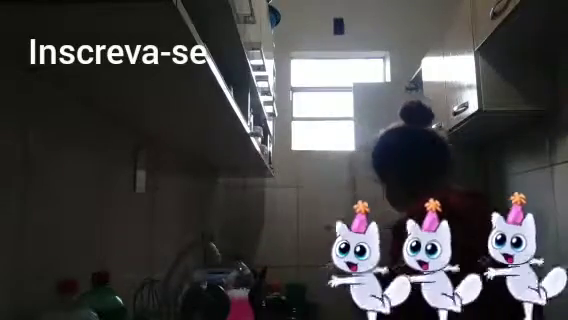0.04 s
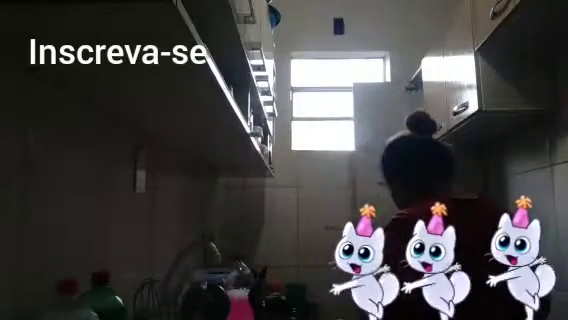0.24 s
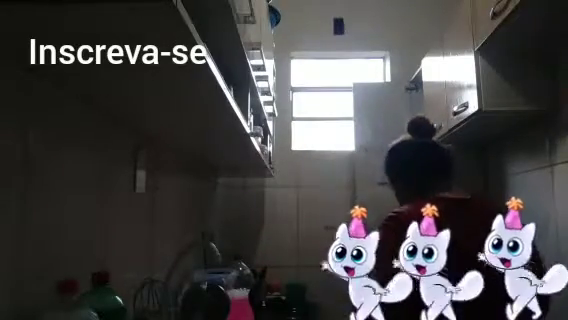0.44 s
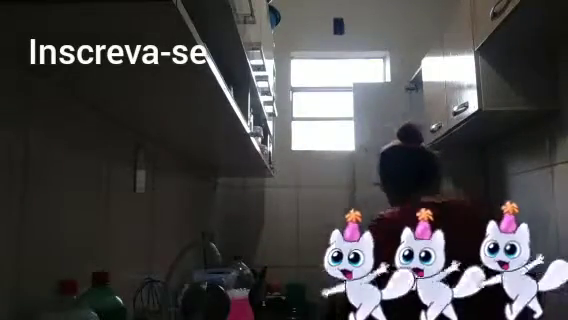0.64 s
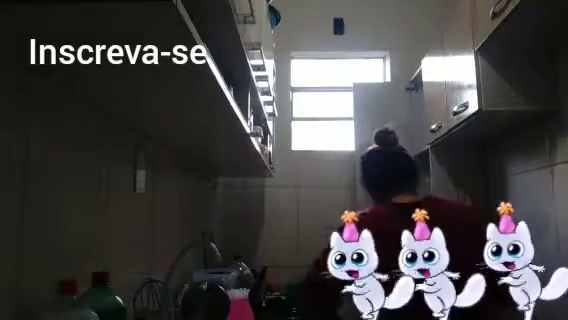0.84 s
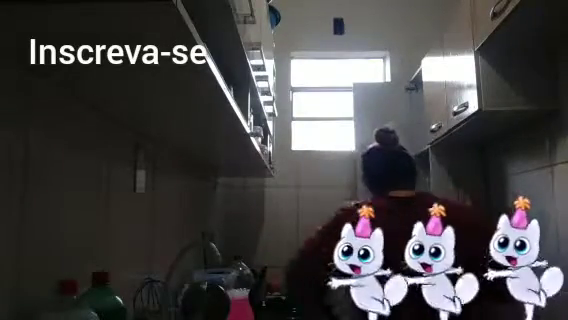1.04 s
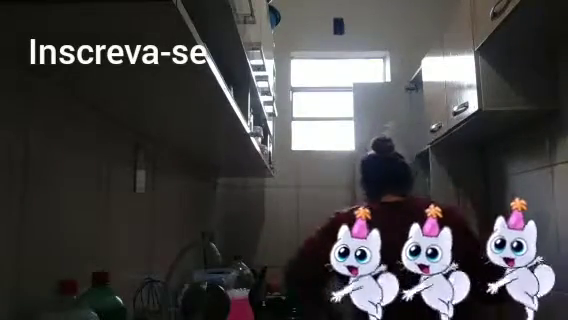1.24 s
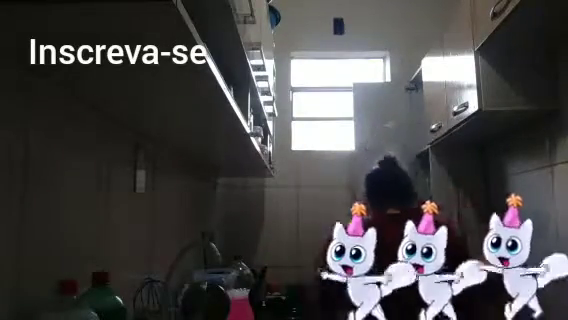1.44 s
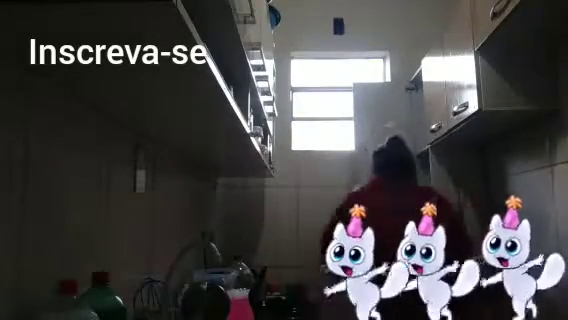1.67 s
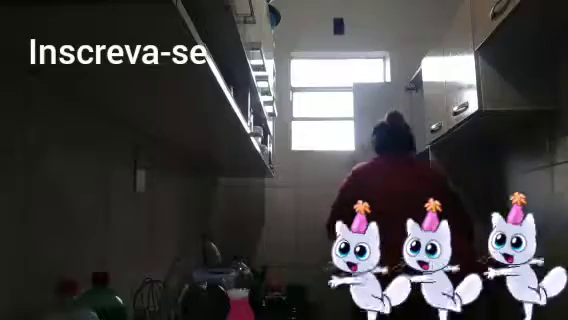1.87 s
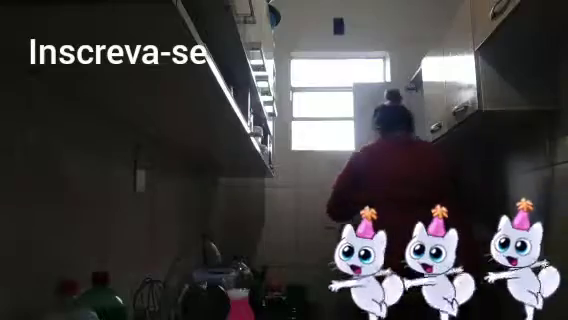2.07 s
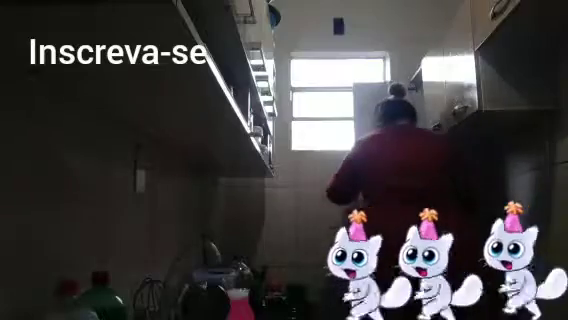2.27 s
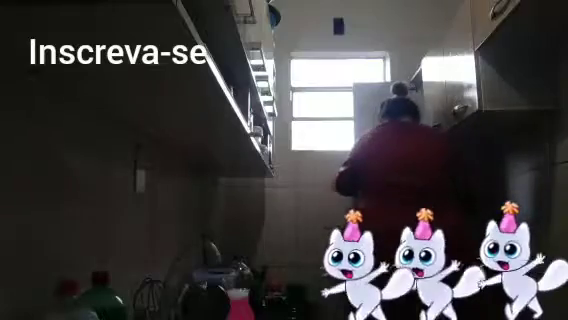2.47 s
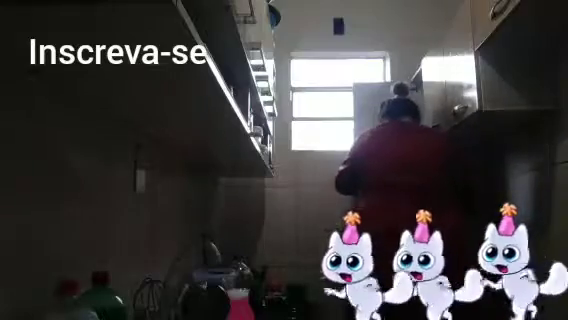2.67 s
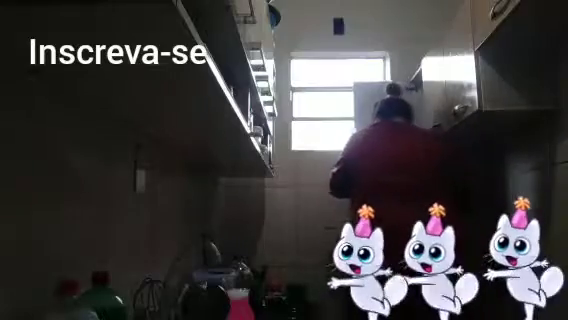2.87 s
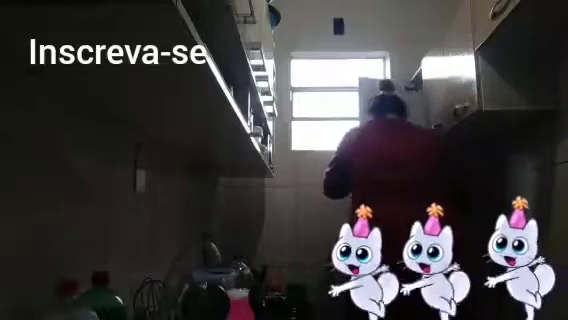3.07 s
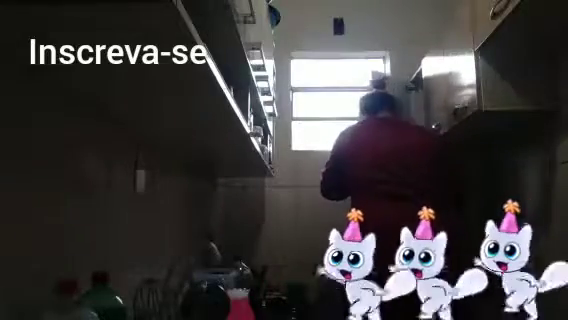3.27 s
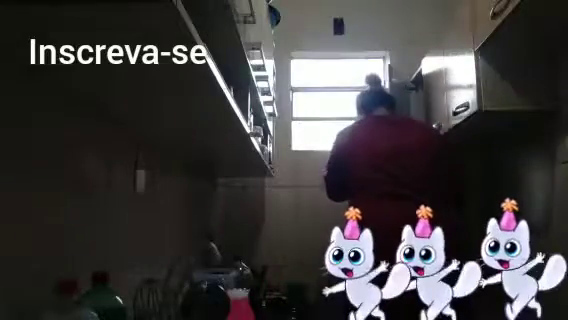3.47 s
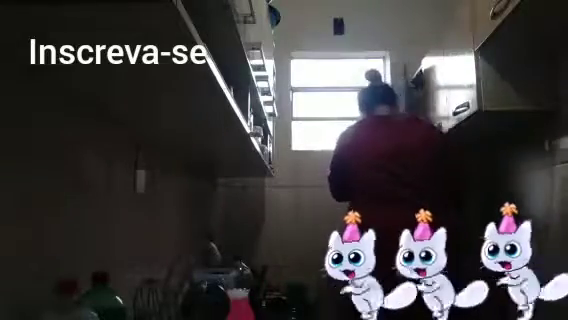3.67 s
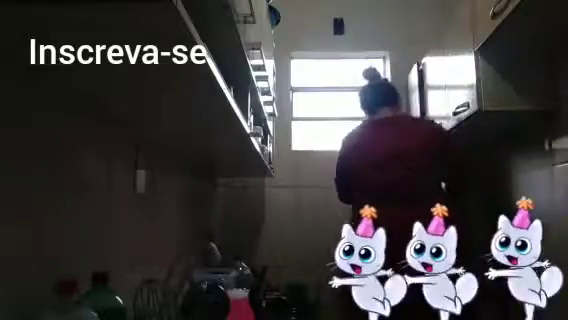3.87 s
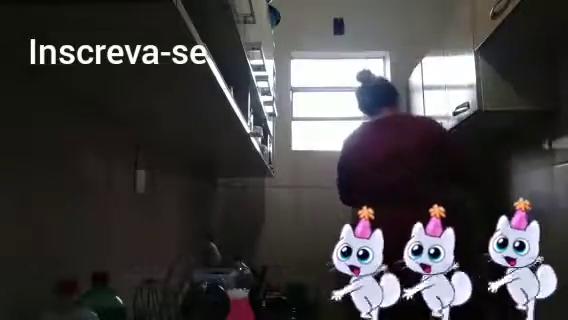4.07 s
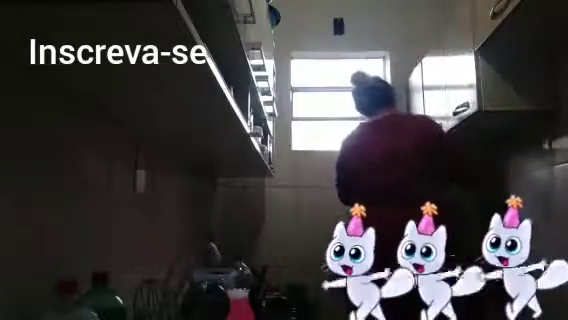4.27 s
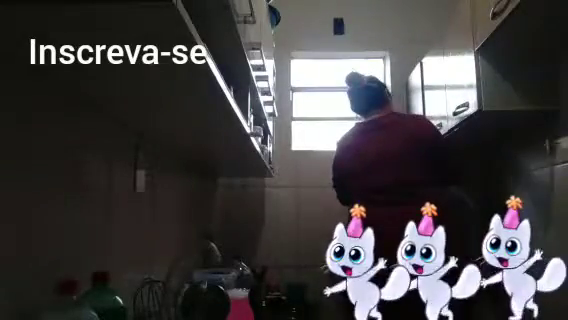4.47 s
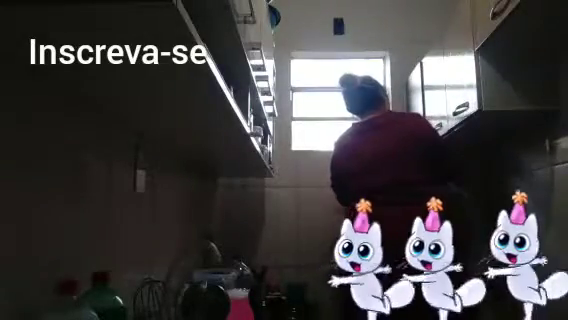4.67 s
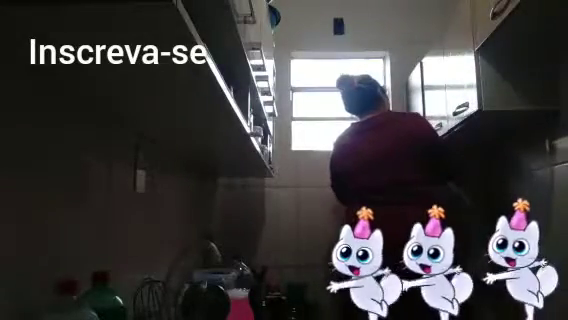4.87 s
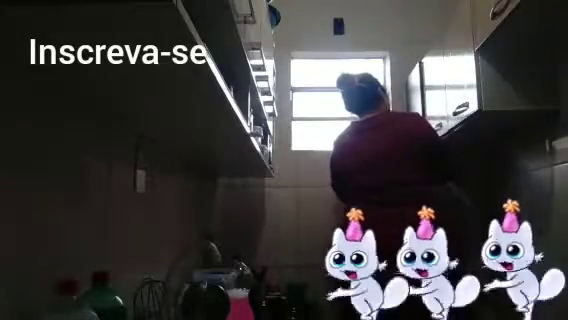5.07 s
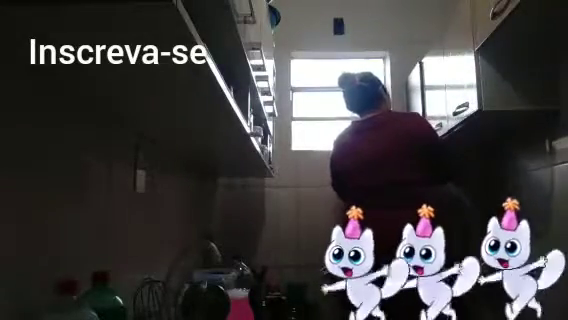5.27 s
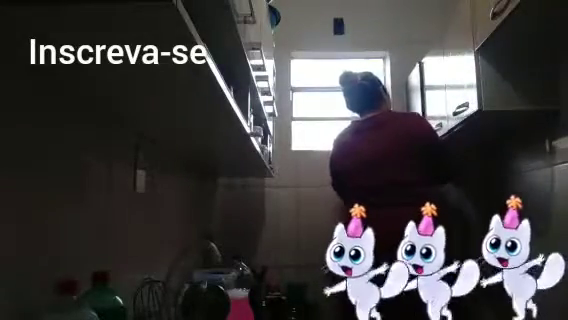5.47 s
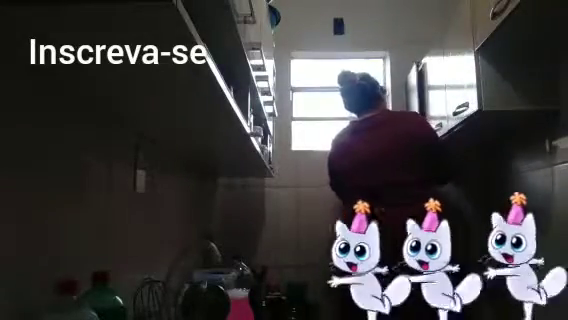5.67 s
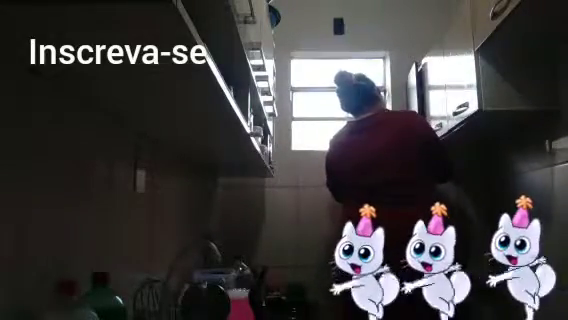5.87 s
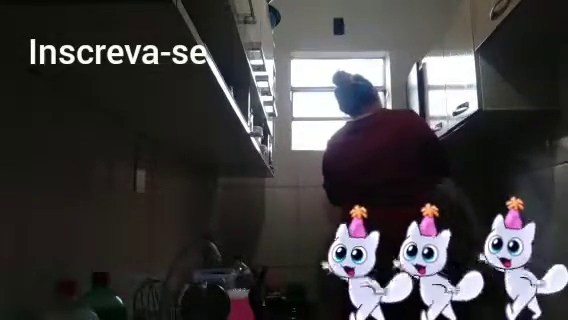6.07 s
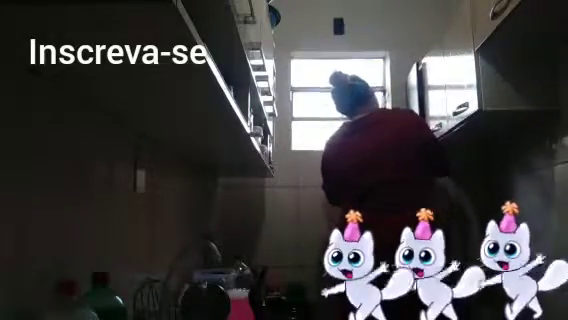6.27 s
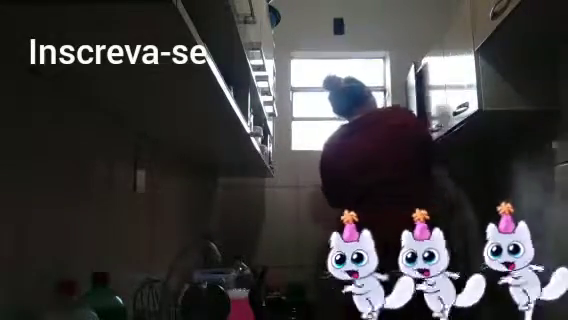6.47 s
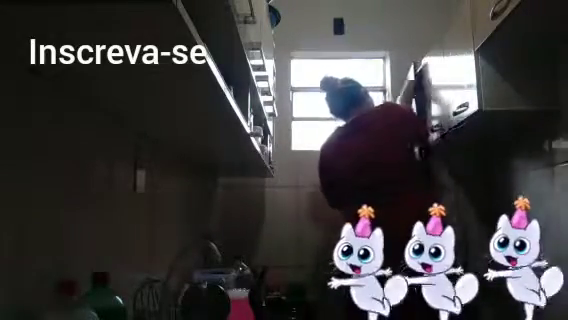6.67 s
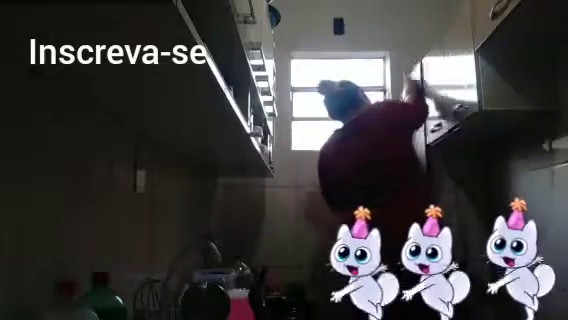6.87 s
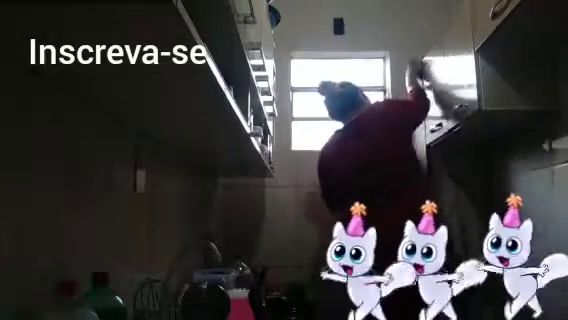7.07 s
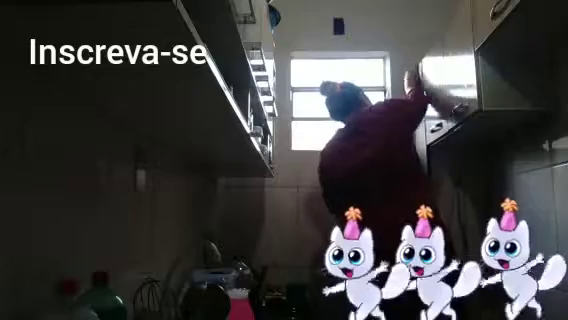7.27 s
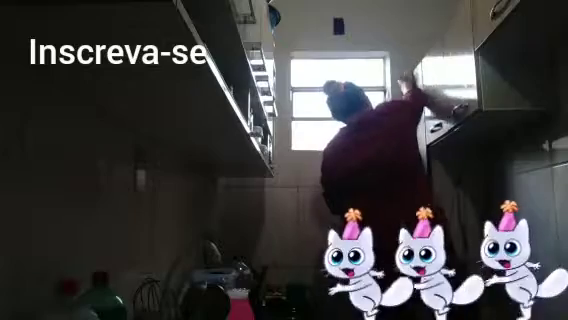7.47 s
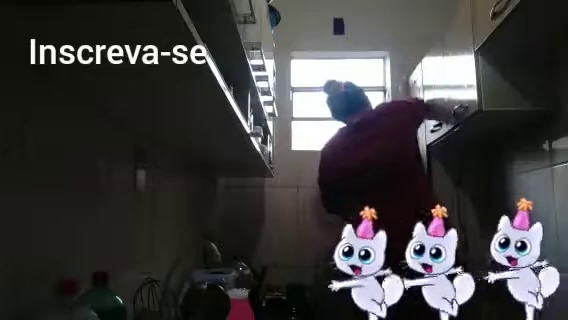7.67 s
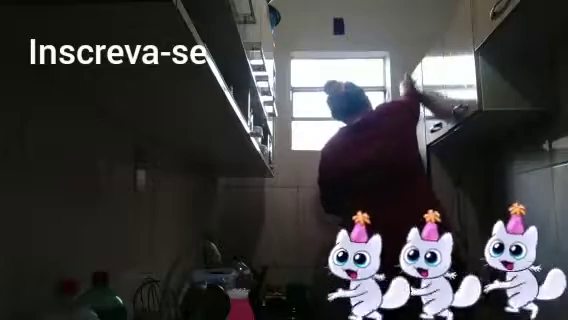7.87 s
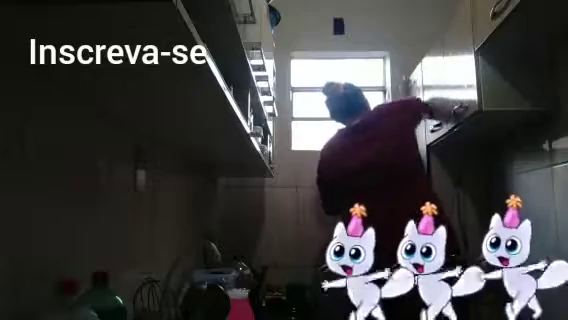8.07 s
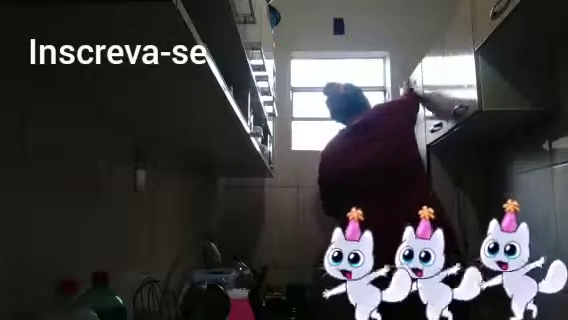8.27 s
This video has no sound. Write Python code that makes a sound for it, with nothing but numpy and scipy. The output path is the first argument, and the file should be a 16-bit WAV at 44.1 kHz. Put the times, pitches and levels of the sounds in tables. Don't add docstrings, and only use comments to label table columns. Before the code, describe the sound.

Cupboard doors bang in a small echoing tiled kitchen: one hard low knock, clattering handling, two booming slams, then softer thuds over faint hiss.

```python
import sys
import numpy as np
from scipy import signal
from scipy.fft import rfft, irfft
from scipy.io import wavfile
from scipy.ndimage import uniform_filter1d

SR = 44100
rng = np.random.default_rng(int(sys.argv[2]) if len(sys.argv) > 2 else 0)


def transcribe(u):
    v = np.clip(np.atleast_2d(u).T, -1, 1)
    q = np.round(v * 32767).astype(np.int16)
    wavfile.write(sys.argv[1], SR, q)


def attenuation_scalar(level_db):
    decades = np.asarray(level_db, float) / 20
    return 10 ** decades


N = 367794
TIME = np.arange(N) / SR


def along(table, hz):
    f, v = np.transpose(table)
    return np.interp(np.log(hz), np.log(f), v)


def unit(x):
    return x / np.sqrt(np.mean(x ** 2))


def band(x, hz, width, order=2):
    edges = np.clip([hz - width / 2, hz + width / 2], 10, SR * .45)
    return signal.sosfilt(signal.butter(order, edges, "band", fs=SR, output="sos"), x)


def colour(x, table):
    hz = np.arange(N // 2 + 1) * SR / N + 1
    return irfft(rfft(x) * attenuation_scalar(along(table, hz)), N)


def even(x, size):
    length = x.shape[-1]
    spectra = rfft(x)
    power = np.abs(spectra) ** 2
    smooth = uniform_filter1d(power, size=size, axis=-1)
    flat = irfft(spectra * np.sqrt(np.mean(power, axis=-1, keepdims=True) / smooth), length)
    return flat * np.clip(np.linspace(6, -1.5, length), 0, 1) ** 2


def gain(table, column=1):
    rows = np.array(table)
    return attenuation_scalar(np.interp(TIME, rows[:, 0], rows[:, column], -120, -120))


def gesture(rows, fade, extra_db=0):
    start, rise, hold, db = np.abs(np.transpose(rows)[:4, :, None])
    coarse = TIME[::44]
    t = coarse - start
    climb = 18 * (t / rise - 1)
    release = np.minimum(0, -fade * (t - rise - hold))
    shape = np.minimum(climb, release)
    return np.interp(TIME, coarse, np.sum((t > 0) * attenuation_scalar(shape - db + extra_db), axis=0))


# frequency in Hz, correlation from 0 to 1.
LIKENESS = [(150, 0.89), (300, 0.49), (600, 0.49), (1000, 0), (16000, .0)]


def two_ports(mid, side, hz):
    like = np.clip(along(LIKENESS, hz), 0, 1)
    return np.sqrt(1 + like) * mid + np.sqrt(1 - like) * side * np.array([[1], [-1]])


def diffuse(size):
    hz = np.arange(size // 2 + 1) * SR / size + 1
    mid, side = rfft(rng.standard_normal((2, size)))
    return two_ports(mid, side, hz), hz


# frequency in Hz, density in dB per Hz.
AIR_COLOUR = [(12, 5.5), (20, 7), (53, -5.5), (116, -2), (170, -9), (700, -21), (4810, -31), (15500, -33)]


def hiss():
    spectra, hz = diffuse(N)
    whine = attenuation_scalar(8.0) / (1 + ((hz - 8030) / 200) ** 2)
    return attenuation_scalar(-50.5) * unit(irfft(spectra * attenuation_scalar(along(AIR_COLOUR, hz)) * (1 + whine), N))


# start in seconds, rise in seconds, hold in seconds, level in dB.
STIR = [
    (0.0, .03, 0.87, -74),
    (4.62, 0.093, 0.03, -32.5),
    (4.84, 0.037, 0.018, -49),
    (5.3, 0.066, .04, -74),
    (5.7, 0.08, 0.32, -37.5),
    (6.17, 0.057, .02, -29),
    (6.6, 0.15, 0.27, -34),
]


def stirred_air():
    mode = unit(band(rng.standard_normal(N), 119.3, 23))
    return attenuation_scalar(-17) * gesture(STIR, 130) * mode


# start in seconds, rise in seconds, hold in seconds, level in dB.
SWELLS = [
    (0.1, 0.1, 0.5, -51.5),
    (0.9, 0.22, 0.24, -54),
    (2.5, 0.098, 0.047, -50),
    (3.96, 0.073, 0.045, -32),
    (6.93, 0.017, 0.074, -30.5),
    (7.68, 0.071, 0.7, -47.5),
    (6.5, 0.14, 0.14, -56.5),
]


def fridge_hum():
    swell = uniform_filter1d(gesture(SWELLS, 74), size=900)
    return (attenuation_scalar(-59) + swell) * unit(band(rng.standard_normal(N), 58.46, 6.3))


def slips():
    grain = uniform_filter1d(rng.exponential(size=N), size=20)
    flurry = uniform_filter1d(np.repeat(rng.standard_normal(N // 400 + 1), 400)[:N], size=300)
    return unit(rng.standard_normal(N) * attenuation_scalar(4.9 * grain + 2.7 * flurry))


# start in seconds, rise in seconds, hold in seconds, level in dB,
# crisp top in dB against the level.
SLEEVES = [(0.03, 0.0091, 0.02, -64, 10), (0.14, 0.012, 0.023, -55, -3), (0.2, 0.021, 0.035, -56.5, 4.5),
           (0.46, 0.012, 0.011, -75, 8), (0.74, 0.022, 0.053, -53, -0.5), (0.8, 0.1, 0.22, -66.5, 2.5),
           (5.77, 0.0039, 0.089, -54, -4.5), (6.02, 0.0036, 0.014, -60.5, -5),
           (6.82, 0.017, 0.061, -51.5, -5), (7.04, 0.054, 0.14, -65, -9), (7.22, 0.045, 0.38, -55, 3),
           (7.69, 0.024, 0.13, -57.5, 3.5), (7.9, 0.034, 0.077, -54, 4), (8.085, 0.03, 0.082, -54.5, 2.5)]
PACKETS = [(1.343, 0.0025, 0.0088, -50, -4), (1.66, 0.0027, 0.0095, -45, 11.5),
           (1.739, 0.0047, 0.017, -49, -18), (2.54, 0.0066, .03, -42, -5), (2.58, 0.003, 0.0084, -48, -9),
           (3.055, 0.0018, 0.0076, -38, -3), (3.09, 0.023, 0.2, -41.5, -0.5), (4.36, 0.019, 0.012, -57, 0),
           (4.5, 0.012, 0.015, -87.5, 14), (6.52, 0.05, 0.095, -48, -4.5), (8.265, 0.002, 0.0076, -48, 3.5)]
SCRAPES = [
    (2.62, 0.011, 0.19, -52, -5),
    (2.925, 0.0025, 0.0059, -45, -8),
    (3.38, 0.032, 0.16, -61.5, -14),
    (3.535, 0.022, 0.054, -45, -5),
    (3.68, 0.0049, 0.11, -55, -40),
    (3.8, 0.013, 0.23, -47.5, -16),
    (5.595, 0.0033, 0.011, -58, -24),
    (5.645, .012, 0.027, -63, -1),
    (6.24, 0.011, 0.073, -66.5, 14),
    (6.36, 0.028, .15, -61.5, 0.5),
]
SHUDDERS = [
    (0.623, 0.0031, 0.014, -55.5, -3),
    (1.385, 0.0069, 0.074, -50.5, -0.5),
    (1.5, 0.009, 0.24, -59.5, -4),
    (2.34, 0.0034, 0.019, -69, 10),
    (3.935, .006, .02, -53, 1),
    (3.958, 0.023, 0.028, -45.5, -11),
    (6.925, 0.01, 0.0097, -47, 7),
]
# body in Hz, its width in Hz, top in Hz, its width in Hz, dull bottom in dB.
CLOTH = (3681, 3846, 8574, 9000, -4)
PLASTIC = (2934, 2994, 7484, 8000, -4)
SHELF = (2520, 2260, 5200, 3900, 1.4)
DOOR = (2200.5, 2400, 6496.5, 8001, 6.5)


def rustle():
    friction = slips()
    dull = unit(band(friction, 1126, 1290, order=1))
    out = np.zeros(N)
    for rows, material, fade in [(SLEEVES, CLOTH, 143), (PACKETS, PLASTIC, 220),
                                 (SCRAPES, SHELF, 530), (SHUDDERS, DOOR, 560)]:
        hz, width, top_hz, top_width, dull_db = material
        body = unit(band(friction, hz, width)) + attenuation_scalar(dull_db) * dull
        top = unit(band(friction, top_hz, top_width))
        crisp_db = np.array(rows)[:, 4:]
        out += gesture(rows, fade) * body + gesture(rows, fade, crisp_db) * top
    return out


# start in seconds, peak in dB, ring in Hz,
# width in Hz, fade in ms.
TICKS = [(0.058, -46.5, 2500, 4300, 5.3), (0.226, -54, 2670, 700, 13), (0.478, -54.5, 3370, 2500, 5.3),
         (0.631, -44.5, 576, 490, 7.5), (0.629, -46.5, 1480, 1420, 4.1), (1.672, -27, 2660, 2920, 1.9),
         (1.744, -30.5, 6000, 8300, 2.1), (2.346, -34, 567, 350, 11), (2.349, -40.5, 1950, 2590, 1.2),
         (2.547, -42.5, 3100, 5170, 10), (2.583, -24, 4300, 4340, 3.9), (2.584, -24.5, 2250, 890, 3.2),
         (2.605, -46, 4470, 4000, 2.5), (2.685, -35.5, 2543, 1810, 4.5), (2.715, -47, 2200, 1200, 3.6),
         (2.931, -34.5, 2160, 1200, 2.5), (2.942, -39, 2020, 1500, 1.5), (3.061, -32.5, 6700, 4040, 2),
         (3.134, -30.5, 2580, 1720, 2), (3.172, -33, 2700, 1790, 4.1), (3.235, -35, 5400, 6000, 8.4),
         (3.273, -30.5, 4430, 6000, 2.3), (3.308, -25.5, 4070, 5820, 1.1), (3.342, -48, 4600, 6900, 2.2),
         (3.543, -38.5, 2000, 2000, 3.9), (3.565, -30, 2520, 1510, 4.4), (3.578, -31.5, 1620, 596, 3.9),
         (3.588, -33, 4250, 4900, 7.3), (3.619, -47, 1460, 597, 6.9), (3.811, -43, 3000, 2500, 4.4),
         (4.364, -45, 1280, 400, 9.1), (4.387, -45.5, 9600, 11000, 4.8), (4.368, -45.5, 2800, 600, 3.5),
         (4.518, -52, 2990, 4020, 3), (5.666, -41, 2500, 3500, 2), (6.946, -27, 1390, 1800, 1.24),
         (8.273, -38, 5600, 7560, 3.5),
         (2.581, -28.5, 7500, 9900, 1.2), (2.593, -39, 4100, 5500, 2), (1.676, -38, 3400, 460, 3.5),
          (3.078, -38, 2800, 4000, 2), (3.143, -26, 4400, 6800, 1.5), (3.151, -31.5, 1750, 1400, 3),
          (3.186, -40, 2300, 1900, 2.6), (3.204, -37.5, 6500, 2600, 5), (3.253, -37, 7200, 2200, 5),
          (3.55, -37, 2600, 4000, 2.4), (3.606, -36.5, 2960, 4300, 6), (0.64, -52.5, 3500, 2600, 3.5),
          (6.586, -49, 4000, 2100, 5), (6.635, -45, 5800, 7500, 5), (6.654, -43.5, 3800, 2100, 3.5),
          (6.936, -31.5, 3140, 1800, 3.3), (3.558, -40, 4800, 5000, 4), (3.572, -33.5, 5100, 4700, 3.6),
          (4.003, -37, 7000, 8000, 3), (6.948, -29.5, 610, 690, 4.9), (4, -40, 2700, 810, 3.4),
          (1.4, -34.5, 1250, 530, 5.5)]


def ticks():
    contacts = TICKS
    out, t = np.zeros(N + 4000), np.arange(4000) / SR
    noises = rng.standard_normal((len(contacts), 4000))
    for (s, db, hz, width, ms), noise in zip(contacts, noises):
        i = int(s * SR)
        fade = np.exp(-t * 1000 / ms)
        out[i:i + 4000] += attenuation_scalar(db + 6.0) * fade * unit(band(noise, hz, width, order=3))
    return out[:N]


def ring(force, modes, damp):
    out = 0
    for k, (hz, db, t60) in enumerate(modes):
        decay = np.log(1000) / (min(t60, .9) * damp)
        pole = np.exp((2j * np.pi * hz - decay) / SR)
        out = out + (-1) ** k * attenuation_scalar(db) * signal.lfilter([1], [1, -pole], force).imag
    return out


def strike(blows, crack_ms, weight_db):
    force, crack = np.zeros(N + 2000), np.zeros(N + 2000)
    fade = np.exp(-np.arange(2000) / (crack_ms * SR / 1000))
    bursts = even(fade * rng.standard_normal((len(blows), 2000)), size=7)
    for (s, db, ms, crack_db, *_), extra_db, burst in zip(blows, weight_db, bursts):
        i = int(s * SR)
        push = np.hanning(int(np.clip(ms, .2, 12) * SR / 1000) + 2)
        force[i:i + len(push)] += attenuation_scalar(db + extra_db) * push / push.sum()
        crack[i:i + 2000] += attenuation_scalar(db + crack_db) * burst
    return force[:N], crack[:N]


# start in seconds, peak in dB, contact in ms, crack in dB against the blow.
LOW_BLOWS = [(0.627, -40, 1.1, -27), (1.309, -19.5, 2.7, -47), (1.369, -19.5, 0.5, -47),
             (1.385, 7, 1.14, -20), (1.39, -5.5, 0.86, -13.5), (1.408, 4, 1.33, -42),
             (1.437, -15, 1.4, -21), (1.464, -6, 1.8, -27), (1.544, -21.5, 1.3, -24),
             (2.317, -19.5, 3.2, -33), (2.346, -22.5, 1.06, -21.5), (2.37, -27.5, 1.7, -19),
             (3.57, -24, 1.7, -37), (3.83, -22.5, 3.2, -38.5), (5.599, -36, 1.46, -24),
             (5.87, -32, 2.8, -48), (6.58, -30, 1.5, -50)]
# frequency in Hz, level in dB, decay time t60 in seconds.
LOW_DOOR = [(112.2, -13, 0.81), (158, -11.5, 0.385), (272, 1.5, 0.17), (333.4, -3.5, 0.22),
            (407.4, -3.5, 0.47), (544.6, -0.5, 0.24), (634, -3, 0.15), (776, -11, 0.23), (860, -5, 0.17),
            (926, 1, 0.19), (1115, -3, 0.17), (1264, -5.5, 0.2), (1440, -7, 0.27), (2000, -9, .2)]
# frequency in Hz, level in dB.
LOW_CRACK = [(150, 12), (390, 25.5), (600, 22.5), (950, 25), (1300, 14), (2000, 15), (3200, 7.5),
             (8000, -15)]


def low_door():
    force, crack = strike(LOW_BLOWS, 1.9, np.zeros(len(LOW_BLOWS)))
    return attenuation_scalar(-13.5) * ring(force, LOW_DOOR, 0.39) + colour(crack, LOW_CRACK)


# start in seconds, peak in dB, contact in ms, #
# panel modes in dB against the blow, slap of the leaf in dB against the blow.
SLAMS = [
    (3.957, -12.5, 2.7, -10, -9),
    (3.977, 4, 4.8, 0.5, -14.5),
    (3.996, -1.5, 3.6, 7, -2),
    (4.024, -9, 3.2, 8, -5.5),
    (6.923, 0, 3.43, -0.5, -2),
    (6.944, -15, 2.67, 20, -8),
    (6.934, -9.5, 3.8, -2.5, -11),
    (6.966, -22.5, 2.7, 2, 13.5),
    (6.985, -8.5, 4.6, 4, 1.5),
    (7.023, -4.5, 6.9, -22, -1.5),
]
KNOCKS = [(2.585, -20.5, 2.6, 2, -18), (2.609, -27.5, 1.64, 15.5, 2), (2.695, -21, 1.1, -23, -30),
          (2.798, -28, 1.8, -14, -11), (3.061, -44.5, 3.9, 21, -2), (3.2, -53, 2.3, 25, -14),
          (3.581, -44.5, 3.1, 27, -3), (4.422, -34.5, 4.4, 3, 3.5), (4.884, -20.5, 6.8, -6, -21),
          (4.917, -25, 5.1, -4, -12), (5.649, -56, 4.4, 33, -9), (5.743, -33.5, 4.3, 5, -15),
          (5.777, -56, 1.6, 4, -12), (5.89, -36.5, 4.1, 0, -16), (6.057, -36, 5.3, -23, -11),
          (6.223, -27.5, 2.5, -4.5, -42), (6.24, -45, 1.2, 0, -25), (6.639, -44, 2.2, 22.5, 4),
          (7.804, -24.5, 5.4, 0, -5.5), (7.888, -15.5, 4.5, -6.5, -8.5), (7.968, -25.5, 3.1, -6, -10),
          (8.014, -29, 5.2, -17, -7), (8.212, -19, 6.5, 0.5, -3.5), (8.239, -15, 7.2, -4, -5)]
# frequency in Hz, level in dB, decay time t60 in seconds.
BOOM = [(56, -37, 1.1), (90, -14.5, 0.47), (120.9, -1, 0.47), (131.4, -11, 1.3)]
SLAP = [(154.4, 5.5, 0.043), (208, -27.5, 0.89), (170.7, -5, 0.27)]
PANEL = [(277.6, -1, 0.35), (351, 0.5, 0.32), (417, -4.5, 0.2), (493, -15, 0.19), (543, -9.5, 0.45),
         (657, -1.5, 0.3), (703, -12, 0.28), (835, -1.5, 0.18), (920, 5, 0.2), (1038, 0, 0.18),
         (1240, -4, 0.25), (1500, -8, .25), (1950, -27, 0.274), (2400, -19, .25)]
# frequency in Hz, level in dB.
PANEL_SNAP = [(200, 2), (450, 11), (700, 21), (1000, 14), (1400, 15), (2000, 2.5), (3000, -2), (6000, -10)]


def wall_cupboards():
    s, db, ms, panel_db, slap_db = np.transpose(SLAMS + KNOCKS)
    crack_db = np.repeat([-9, -23], [len(SLAMS), len(KNOCKS)]) - 4.5 * ms
    new_blow = np.abs(np.diff(s, prepend=0)) > .05
    first = np.maximum.accumulate(np.where(new_blow, np.arange(len(s)), 0))
    rows = np.transpose([s, db, ms, crack_db - 150 * (s - s[first])])
    force, crack = strike(rows, 58.0, np.zeros(len(rows)))
    flex, snap = strike(rows * [1, 1, 0.5, 1], 4.8, panel_db)
    slap, _ = strike(rows, 9.0, slap_db)
    boom = ring(force, BOOM, 0.57) + ring(slap, SLAP, 0.92)
    cracks = attenuation_scalar(20.0) * band(crack, 390, 460) + colour(snap, PANEL_SNAP)
    return band(boom, 542, 861), attenuation_scalar(-20.0) * ring(flex, PANEL, 0.27) + cracks


# start in seconds, rise in seconds, hold in seconds, level in dB.
DRAG = [
    (2.59, 0.014, 0.037, -32.5),
    (2.72, 0.021, 0.18, -48),
    (3.06, 0.062, 0.39, -56.5),
]


def dragged_load():
    return attenuation_scalar(-1.5) * gesture(DRAG, 66) * unit(band(rng.standard_normal(N), 158, 170))


# frequency in Hz, width in Hz, level in dB.
SLIDE = [(1570, 114, 3), (2250, 540, 2), (3300, 130, -2), (907, 190, 1.5), (5400, 160, -17.5),
         (6820, 310, -11)]
# time in seconds, level in dB.
SLIDE_LEVEL = [
    (2.68, -55),
    (2.766, -52),
    (2.782, -52.5),
    (2.944, -52),
    (2.98, -97),
]


def sliding_tin():
    friction = slips()
    tin = sum(attenuation_scalar(db) * unit(band(friction, hz, 1.8 * width)) for hz, width, db in SLIDE)
    return gain(SLIDE_LEVEL) * tin


# time in seconds, slip rate in Hz, level in dB.
CREAK = [
    (5.646, 292.7, -42),
    (5.674, 309.6, -48),
    (5.72, 298, -85),
]


def creak():
    s, hz, _ = np.transpose(CREAK)
    wobble = 1 + .5 * uniform_filter1d(rng.standard_normal(N), size=200)
    cycles = np.cumsum(np.interp(TIME, s, hz) * wobble / SR)
    clicks = np.diff(np.floor(cycles), prepend=0)
    leaf = unit(band(clicks, 640, 880)) + attenuation_scalar(-3.0) * unit(band(clicks, 2900, 2100))
    return gain(CREAK, 2) * leaf


# frequency in Hz, decay time t60 in seconds.
ROOM_T60 = [(100, 0.88), (500, 0.66), (1500, 0.51), (4000, 0.48), (12000, 0.2)]


def kitchen(x):
    size = SR // 2
    spectra, hz = diffuse(size)
    t = np.arange(size) / SR
    tail = 0
    for centre in 90 * 2 ** np.arange(8.):
        share = np.clip(1 - np.abs(np.log2(hz / centre)), 0, 1)
        fall_db = -60 * t / along(ROOM_T60, centre)
        decay = attenuation_scalar(fall_db) + attenuation_scalar(8.5 + fall_db / 0.19)
        tail = tail + irfft(spectra * share, size) * decay
    tail = tail * (1 - np.exp(-t / 0.000082))
    mid, side = rfft(even(np.array([tail[0] + tail[1], tail[0] - tail[1]]), size=20))
    mid, side = mid / np.abs(mid).mean(), side / np.abs(side).mean()
    tail = irfft(two_ports(mid, side, hz), size) * (t < .45)
    tail = tail / np.sqrt(np.mean(np.sum(tail ** 2, axis=1)))
    return signal.fftconvolve(x[None], tail, axes=1)[:, :N]


def scene():
    background = hiss() + stirred_air() + fridge_hum()
    small, sharp, low = rustle(), ticks(), low_door()
    boom, panels = wall_cupboards()
    boom = boom + dragged_load()
    small = small + sliding_tin() + creak()
    direct = boom + attenuation_scalar(-4.5) * (low + panels) + attenuation_scalar(-26) * small + attenuation_scalar(-16.5) * sharp
    lag = 9
    ports = np.array([attenuation_scalar(-0.53) * np.roll(direct, lag), attenuation_scalar(-1.7) * direct])
    to_room = attenuation_scalar(-7.5) * boom + attenuation_scalar(-2.0) * (low + panels) + attenuation_scalar(0.5) * sharp + attenuation_scalar(-1.0) * small
    return ports + kitchen(to_room) + background


def roll_off(x):
    return signal.sosfilt(signal.butter(12, 16460, fs=SR, output="sos"), x)


def record(dry):
    rounded = np.tanh(.95 * dry) / .95
    mix = signal.sosfilt(signal.ellip(8, .2, 70, 15550, fs=SR, output="sos"), rounded)
    return roll_off(mix)


dry = scene()
out = record(dry)
transcribe(out)
```